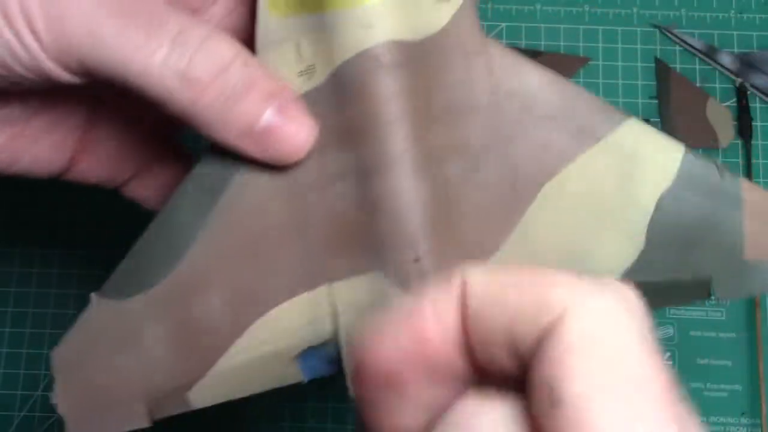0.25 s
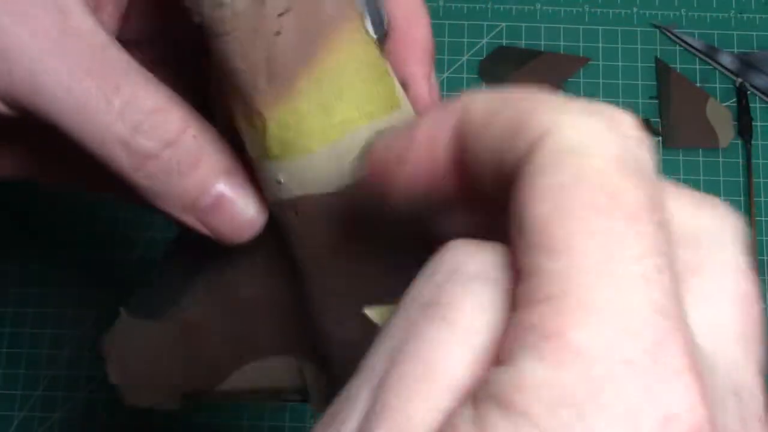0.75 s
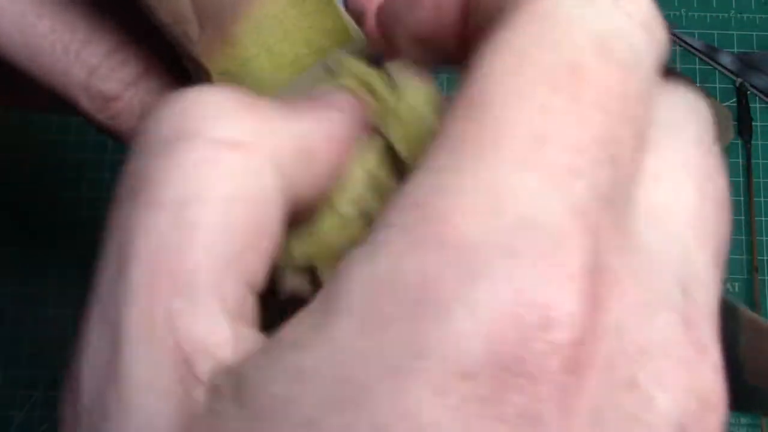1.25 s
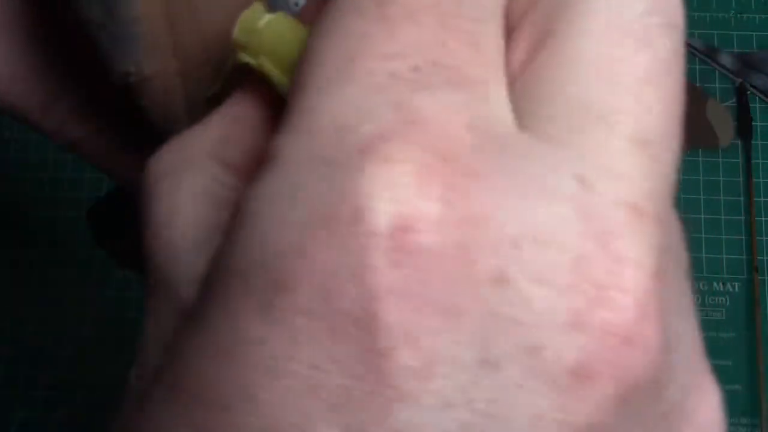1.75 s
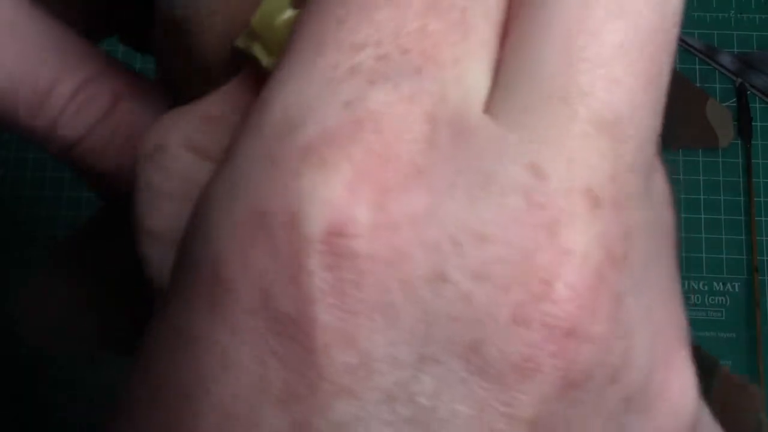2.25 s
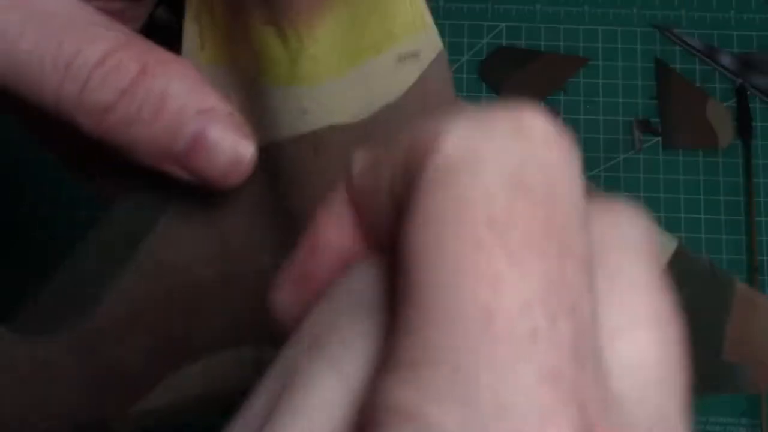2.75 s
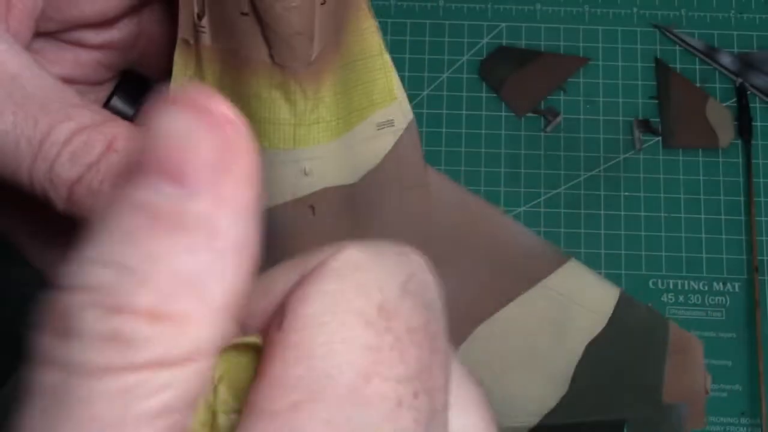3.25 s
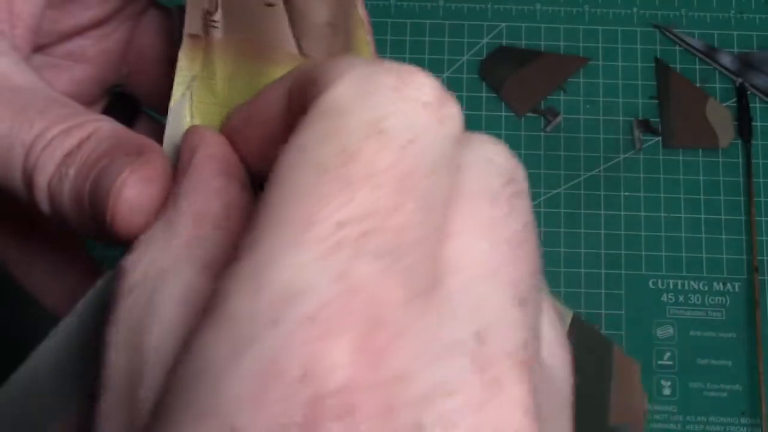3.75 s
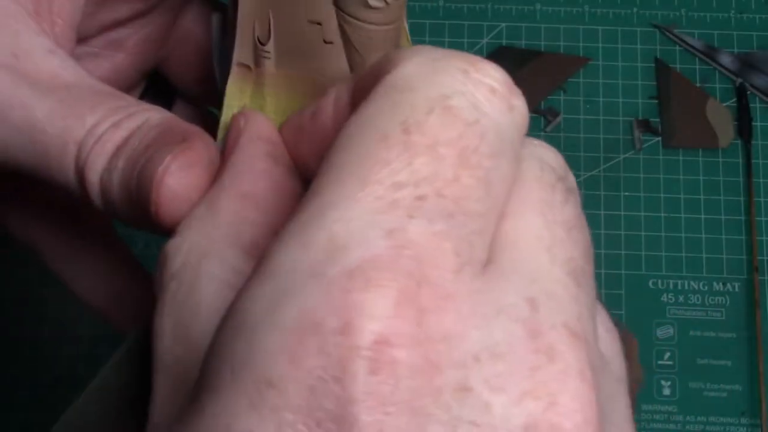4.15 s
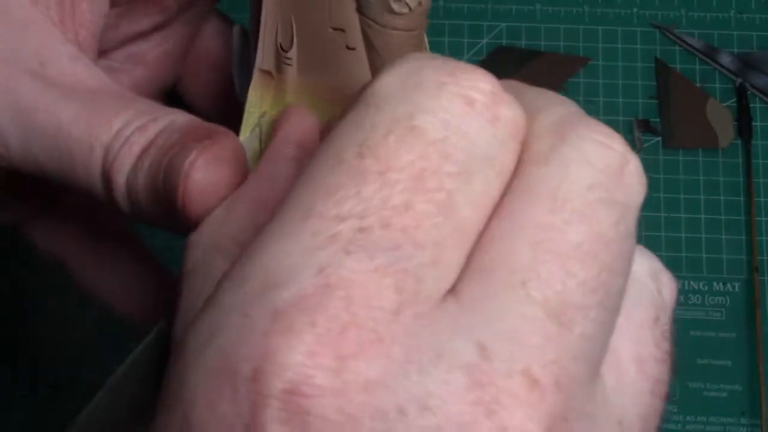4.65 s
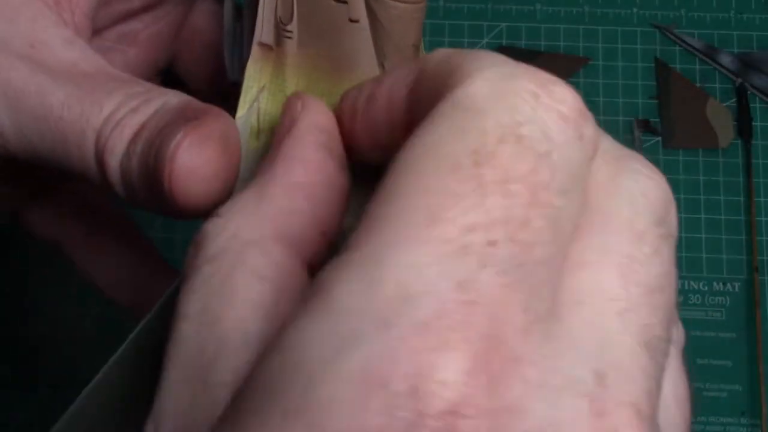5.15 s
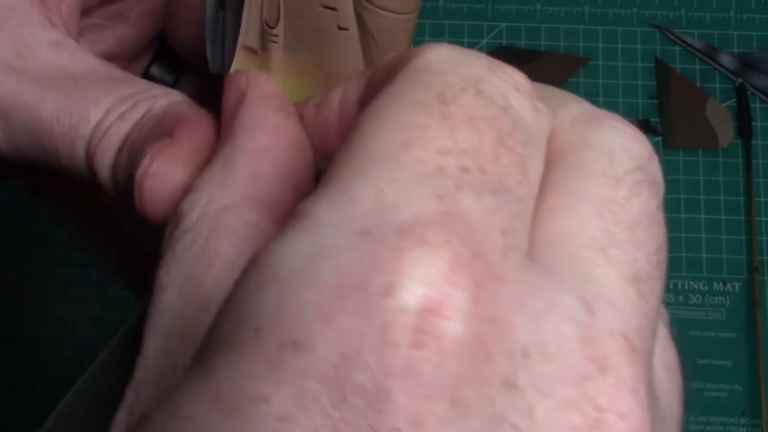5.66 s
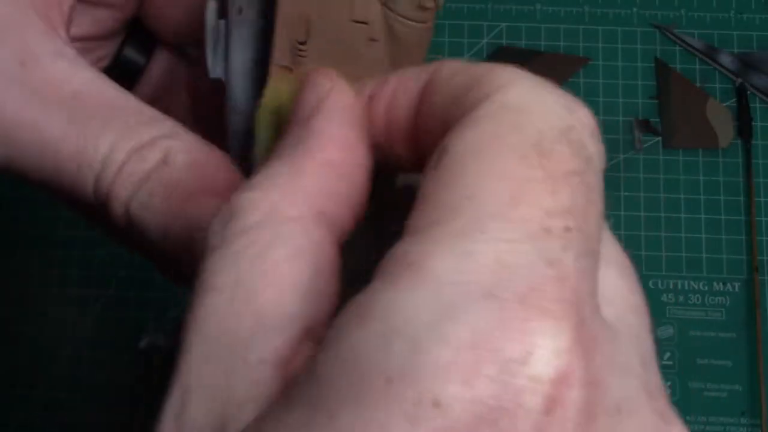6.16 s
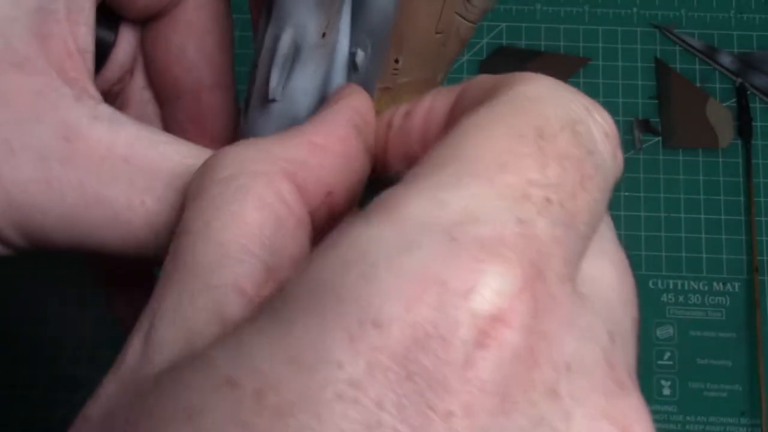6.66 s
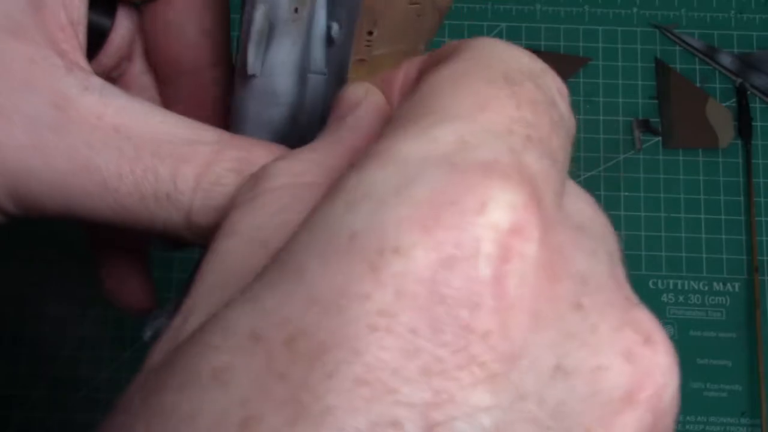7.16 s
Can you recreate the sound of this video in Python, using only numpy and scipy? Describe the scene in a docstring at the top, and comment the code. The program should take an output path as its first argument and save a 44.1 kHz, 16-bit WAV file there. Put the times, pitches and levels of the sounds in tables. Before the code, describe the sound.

Hands work sticky tape and thin paper right in front of the microphones. Busy dry crackling with bright snaps opens, pauses around a run of hollow plastic ticks, and returns with small squeaks and crumples. Then it quietens to gentle finger rubs and rustles, interrupted by a hard plastic clack and later a second, softer one. The small room adds a short, faint reflection and a low steady hush.

```python
"""Peeling tape and paper off a plastic model

Masking tape and paper leave a hollow model and crumple in the fingers: random slips drive shell, paper and glue.
Creases snap as noise bursts through resonances, the tape squeaks as narrow noise with a gliding pitch.
The shell clicks as damped modes with a crack of noise, hands bump the bench as short sine swings.
Close stereo microphones, a small room of fading noise reflections, steady room tone of coloured noise.
"""
import sys
import numpy as np
from scipy import signal
from scipy.fft import rfft, irfft, next_fast_len
from scipy.io import wavfile
from scipy.ndimage import uniform_filter1d

SR = 44100
rng = np.random.default_rng(int(sys.argv[2]) if len(sys.argv) > 2 else 0)


def store_pcm(level_fs):
    """Save levels as 16-bit WAV."""
    pcm = np.round(np.clip(level_fs, -1, 1) * 32767).astype(np.int16)
    wavfile.write(sys.argv[1], SR, np.atleast_2d(pcm).T)


N = 326781

# colour of rubbing on the shell: f/Hz, relative density/dB per Hz
RUB_COLOUR = [(100, -21), (280, -0.5), (600, -1), (1200, 6), (2000, 4), (2500, -4), (4000, -46)]
# colour of glue fizz and sharp edges: f/Hz, relative density/dB per Hz
FIZZ_COLOUR = [(4000, -33), (5600, 3), (6700, 3), (8500, 0), (11000, -4.5), (13500, -9.5), (16000, -31.5)]


def gain_of(db):
    """Decibels to an amplitude factor."""
    return 10 ** (np.asarray(db) / 20)


def evened(x):
    """Scaled to an rms of 1."""
    return x / np.sqrt(np.mean(x ** 2) + 1e-20)


def struck(x, size):
    """Scaled as if all its energy fell in size samples at an rms of 1."""
    return x / np.sqrt(np.sum(x ** 2) / size + 1e-20)


def blend(a, b, share):
    """Two sounds at a joint rms of 1, the second with this share of the power."""
    share = np.clip(share, 0, 1)
    return evened(np.sqrt(1 - share) * evened(a) + np.sqrt(share) * evened(b))


def read(points, hz):
    """A table of points joined on a log-frequency axis."""
    f, value = np.transpose(points)
    return np.interp(np.log(hz + 1), np.log(f + 1), value)


def add(mix, s, sound):
    """Mixes a sound in at time s."""
    part = mix[max(round(s * SR), 0):][:len(sound)]
    part += sound[:len(part)]


def coloured(x, points, ripple_db=0, size=2048):
    """Minimum-phase filter with this spectrum; ripple adds the many small resonances of a sheet."""
    hz = np.fft.rfftfreq(size, 1 / SR)
    ripple = evened(uniform_filter1d(rng.standard_normal(len(hz)), size=7))
    log_gain = np.log(gain_of(read(points, hz) + ripple_db * ripple))
    both_sides = np.r_[log_gain, log_gain[-2:0:-1]]
    spectrum = np.exp(signal.hilbert(both_sides).conj())
    taps = np.fft.ifft(spectrum).real
    return signal.oaconvolve(x, taps[:size // 2])[:len(x)]


def resonate(x, hz, width_hz):
    """A resonance of gain 1 that can follow a moving pitch: shift to 0 Hz, low-pass, shift back."""
    turn = np.exp(2j * np.pi * np.cumsum(hz * np.ones(len(x))) / SR)
    r = np.exp(-np.pi * width_hz / SR)
    slow = signal.lfilter([1 - r], [1, -r], x / turn + 1e-18)
    return 2 * (turn * slow).real


def hush():
    """Steady room tone: coloured noise, mostly alike in both channels."""
    # colour: f/Hz, relative density/dB per Hz
    colour = [(25, -28), (45, -17), (60, -8), (85, -10.5), (130, -2.5), (330, 0.5), (700, -3.5),
              (1300, -7.5), (2000, -9), (4000, -17.5), (7000, -22), (13000, -30.5), (16000, -52)]
    # left-right likeness: f/Hz, correlation
    likeness = [(30, 0.36), (120, 0.86), (300, 0.77), (1000, 0.8), (4000, 0.64), (14000, 0.89)]
    level_db = -62.5
    size = next_fast_len(N)
    hz = np.fft.rfftfreq(size, 1 / SR)
    left, other = rfft(rng.standard_normal((2, size)))
    same = np.clip(read(likeness, hz), -1, 1)
    right = same * left + np.sqrt(1 - same ** 2) * other
    pair = np.array([left, right]) * gain_of(read(colour, hz))
    return gain_of(level_db) * evened(irfft(pair, size)[:, :N])


def handling():
    """Levels of rub, crinkle, fizz and spread of slip sizes (dB): strokes build, swell, die over a rustle."""
    # pulls, rubs and squeezes of the fingers, levels before the trims in peeling: start/s, length/s,
    # crinkle/dB, swell over the stroke/dB, rub/dB re crinkle, fizz/dB re crinkle,
    # spread of slip sizes/dB (low slides, high crumples)
    strokes = [(0.023, 0.044, -43, -2, -6, -4.5, 1.5), (0.102, 0.059, -43, 1.5, -6.5, -3, 3.5),
               (0.228, 0.061, -50.5, -7, -10, 0, 9.5), (0.318, 0.013, -39.5, -4, -22, -4.5, 2),
               (0.463, 0.025, -37, 13, -8, 0, 6), (0.563, 0.13, -50.5, 5.5, 0, -3.5, 4),
               (0.832, 0.053, -48, 4, -11.5, -5, 4), (0.938, 0.052, -40.5, -1, -13, -4.5, 3),
               (1.108, 0.068, -47, -2.5, -6.5, 2.5, 2), (1.194, 0.053, -43.5, 6, -6, -2, 3),
               (1.426, 0.041, -57.5, 2, -2.5, -1, 6.5), (1.546, 0.034, -61, 13.5, 5, 3, 15),
               (1.636, 0.055, -61.5, -4, 3, 1, 5), (1.81, 0.17, -61.5, -6, 9, -9, 4),
               (2.192, 0.096, -48.5, -7.5, -4, -1, 2), (2.441, 0.007, -53.5, 4.5, 0, -8, 8.5),
               (2.511, 0.069, -55, -2, 0, -0.5, 9.5), (2.644, 0.028, -55, -8, 2, -0.5, 5),
               (2.724, 0.042, -54, -6, -1.5, 0, 0.5), (2.887, 0.061, -40, 11.5, -15.5, -7.5, 2.5),
               (3.081, 0.014, -49.5, 6, -9, 0, -0.5), (3.233, 0.014, -52, -4, -1.5, -1.5, 2),
               (3.27, .022, -49.5, 0, 4, 2.5, 2.5), (3.328, 0.041, -44.5, -1.5, -19.5, 0, 4.5),
               (3.418, .05, -62, 14, -7, -7, 8.5), (3.676, 0.088, -63.5, 10, 6, -4, 2.5),
               (3.97, 0.032, -63, 0, 2, -12, 3.5), (4.076, 0.036, -58.5, 7, 0, -10.5, 3),
               (4.202, 0.012, -57.5, 5, 1.5, -5, 0.5), (4.264, 0.067, -59, 0, 4, -16, 3.5),
               (4.344, 0.048, -49, 10.5, -5.5, -7, 2.5), (5.184, 0.11, -63, -1, 3, -10.5, 2.5),
               (5.466, 0.048, -59, -6, -16, -1, 2), (5.744, 0.03, -68.5, 15, 12.5, -9, 10.5),
               (6.018, 0.081, -51, -6.5, -7.5, -6, 2.5), (6.176, 0.012, -56, 5, 5, -13, 2),
               (6.23, 0.025, -49, 2.5, -0.5, -5, 2), (6.315, 0.038, -53, 2, -5.5, -10, 1),
               (6.517, 0.046, -60, -7, -7, -9, 3), (6.682, 0.061, -58.5, -1, -5, -11, 2.5),
               (6.889, 0.022, -52.5, 1, -6, -16, 7.5), (7.077, 0.096, -55, -7, -0.5, -2, 0)]
    # rustle of the held paper, before the trims: t/s, crinkle/dB
    rustle_points = [(0, -69), (.4, -53.5), (.53, -51), (.78, -57), (.91, -71.5), (1.05, -70), (1.39, -69),
                     (1.65, -63.5), (2.08, -69.5), (2.48, -67), (2.82, -52), (3.04, -54), (3.21, -71),
                     (3.4, -55.5), (3.9, -75), (4.65, -63.5), (4.8, -72), (5.9, -73), (6.0, -59),
                     (6.43, -74), (6.95, -63.5), (7.4, -70.5)]
    rustle_rub_db, rustle_fizz_db, rustle_spread_db = -6, -5.5, 4.5
    # 20 dB rise and fall times: fixed part plus share of the length, so slow strokes are softer
    attack_s, attack_share = 0.012, 0.35
    release_s, release_share = 0.022, 0.543

    t = np.arange(N) / SR
    rustle = gain_of(np.interp(t, *np.transpose(rustle_points))) ** 2
    power = rustle * gain_of([[rustle_rub_db], [0], [rustle_fizz_db]]) ** 2
    spread = rustle * rustle_spread_db
    for start, length, db, swell_db, rub_db, fizz_db, spread_db in strokes:
        attack = attack_s + attack_share * length
        release = release_s + release_share * length
        near = slice(*np.searchsorted(t, [start - 2 * attack, start + length + 2 * release]))
        age = t[near] - start
        fade = np.maximum(-age / attack, 0) + np.maximum((age - length) / release, 0)
        swell = swell_db * (np.clip(age / length, 0, 1) - 0.5)
        pull = gain_of(db + swell - 20 * fade) ** 2
        power[:, near] += pull * gain_of([[rub_db], [0], [fizz_db]]) ** 2
        spread[near] += pull * spread_db
    rub, crinkle, fizz = 10 * np.log10(power)
    return rub, crinkle, fizz, spread / power[1]  # power-weighted mean spread


def sheet(slips, points, ripple_db, count=7, size=1500):
    """The sheet keeps changing shape: each run of size slip samples rings one of count sets of facets."""
    shape = np.repeat(rng.integers(0, count, N // size + 1), size)[:N]
    return evened(sum(coloured(slips * (shape == k), points, ripple_db) for k in range(count)))


def shell_ring(wing_db=0, tilt_db=0, linger_db=-29, linger_s=0.28, lowest_hz=260):
    """The shell's answer to a tap: the hand stops most of each mode quickly, a little lingers (t60 linger_s)."""
    # hand-damped modes of the shell: f/Hz, relative level/dB, t60/s
    shell_modes = [(340, -19, 0.047), (518, -16.5, 0.18), (727, -11.5, 0.14), (877, -3.5, 0.026),
                   (1185, -3.5, 0.083), (1294, -3.5, 0.074), (1508, 4.5, 0.03), (1696, -1.5, 0.029),
                   (2310, -29, 0.026), (2496, 4.5, 0.0077), (2900, -0.5, 0.029), (3290, 2.5, 0.013),
                   (3300, -2.5, 0.059), (3930, -4.5, 0.025), (4200, -4, 0.024), (4700, -3, 0.015),
                   (4780, -16, 0.031), (6030, -23, .02), (7030, -26, 0.02)]
    # close pair of modes of the wing panel: f/Hz, relative level/dB, t60/s
    wing_modes = [(1843, 6, 0.03), (2020, 3, 0.016)]
    t = np.arange(SR // 4) / SR
    modes = list(shell_modes) + [(hz, db + wing_db, t60) for hz, db, t60 in wing_modes]
    linger = gain_of(linger_db - 60 * t / linger_s)
    ring = np.zeros(len(t))
    for k, (hz, db, t60) in enumerate(sorted(modes, key=lambda mode: mode[0])):
        level = gain_of(db + tilt_db * np.log2(hz / wing_modes[0][0]))
        decay = gain_of(-60 * t / t60) + linger
        ring += (-1) ** k * level * np.cos(2 * np.pi * hz * t) * decay  # neighbours in opposite sign
    # a small body radiates little bass
    return signal.sosfilt(signal.butter(2, lowest_hz, "high", fs=SR, output="sos"), ring)


def peeling(rub, crinkle, fizz, spread_db, slips_per_s=11000, clumping=0.91):
    """Thousands of tiny slips and glue threads, in clumps, drive shell, paper and air together."""
    # colour of the paper: f/Hz, relative density/dB per Hz
    crinkle_colour = [(1200, -27), (1900, -22.5), (2350, 5.5), (3200, 3.5), (4000, 4.5), (6000, -3),
                      (7200, -10.5), (11000, -51.5)]
    shell_share, flap_share = 0.031, 0.096  # of the power
    rub_trim_db, crinkle_trim_db, fizz_trim_db = -1, -3, -2
    # free flap: short and high while glue lets go, long and low while paper drags on the shell
    flap_mid_hz, flap_octaves_per_db, flap_width_hz = 3700, 0.13, 1400

    clumps = gain_of(clumping * spread_db * evened(uniform_filter1d(rng.standard_normal(N), size=130)))
    sizes = gain_of(spread_db * np.minimum(rng.exponential(1, N), 5)) * rng.choice([-1, 1], N)
    slips = sizes * clumps * (rng.random(N) < slips_per_s / SR)
    slips /= np.sqrt(uniform_filter1d(slips ** 2, size=900) + 1e-6)  # the pull sets the mean power

    ringing = signal.oaconvolve(slips, shell_ring())[:N]
    shell = blend(sheet(slips, RUB_COLOUR, ripple_db=5), ringing, shell_share)
    flap_hz = flap_mid_hz * 2 ** np.clip(flap_octaves_per_db * (fizz - rub), -1, 1)
    flap = resonate(np.roll(slips, 60), flap_hz, 2 * flap_width_hz)  # 60 samples late
    flap = resonate(flap, flap_hz, flap_width_hz)
    paper = blend(sheet(slips, crinkle_colour, ripple_db=3.2), flap, flap_share)
    glue = sheet(slips, FIZZ_COLOUR, ripple_db=2.5)
    return (gain_of(rub + rub_trim_db) * shell + gain_of(crinkle + crinkle_trim_db) * paper
            + gain_of(fizz + fizz_trim_db) * glue)


def lesser_creases(crinkle_db, spread_db, count=400):
    """Chance snap rows (s, dB, Hz, edge dB): only while the paper crumples, as strong as it is worked."""
    creases_per_s, crumpling_from_db = 14, 3.5  # rate while the spread of slips exceeds the threshold
    level_db, level_scatter_db = 4.5, 2.5  # re crinkle of the moment, both before trims
    mid_hz, scatter_octaves = 3600, 0.22
    edge_db, edge_scatter_db = -6, 6  # re the snap's level
    at, chance = rng.integers(0, N, count), rng.random(count)
    size, pitch, edge = rng.standard_normal((count, 3)).T
    rows = np.column_stack([at / SR,
                            crinkle_db[at] + level_db + level_scatter_db * size,
                            mid_hz * 2 ** (scatter_octaves * pitch),
                            edge_db + edge_scatter_db * edge])
    happens = chance < creases_per_s * N / SR / count
    return list(rows[happens & (spread_db[at] > crumpling_from_db)])


def snaps(rows, buckle_s=0.0016, scatter=0.34, width_hz=1300, trim_db=-2, push_db=-14, skin_db=-8):
    """A crease buckles in a sharp step and short rattle; the facet beside it and plastic beneath ring."""
    # thin plastic under the tape: f/Hz, relative level/dB, t60/s
    skin_modes = [(2290, 8, 0.05), (2615, 4.5, 0.03), (3390, -15, .08), (3960, -3, 0.071), (4230, -4, 0.19),
                  (4950, -1.5, 0.036), (6200, -6, 0.037), (8350, 1, 0.097)]
    out, t = np.zeros(N), np.arange(4400) / SR
    skin = sum(gain_of(db - 60 * t / t60) * np.cos(2 * np.pi * hz * t) for hz, db, t60 in skin_modes)
    for s, db, hz, edge_db in rows:
        buckle = scatter * rng.standard_normal(len(t)) * np.exp(-t / buckle_s)
        buckle[0] += 1
        facet = np.diff(resonate(buckle, hz, 2 * width_hz), prepend=0)
        facet = resonate(facet, hz, width_hz)
        parts = [(0, facet),
                 (edge_db, coloured(buckle, FIZZ_COLOUR)),
                 (push_db, coloured(buckle, RUB_COLOUR)),
                 (skin_db, signal.fftconvolve(facet, skin)[:len(t)])]
        add(out, s, sum(gain_of(db + trim_db + part_db) * struck(part, size=200) for part_db, part in parts))
    return out


def squeaks():
    """Uneven stick and slip sets a taut strip ringing; its pitch moves with the free length."""
    # start/s, end/s, start f/Hz, end f/Hz, width of each resonance/Hz, rms before taper/dB
    squeak_rows = [(0.575, 0.73, 1610, 1750, 500, -55), (2.189, 2.395, 524, 500, 384, -55),
                   (2.208, 2.333, 1050, 990, 190, -52), (2.214, 2.308, 3420, 3200, 260, -51.5),
                   (2.244, 2.46, 3390, 3410, 90, -65.5), (2.694, 2.788, 1510, 1630, 150, -46.5),
                   (3.617, 3.661, 560, 500, 490, -54.5), (4.34, 4.404, 2500, 2580, 200, -48.5),
                   (4.349, 4.405, 2030, 2000, 180, -48), (4.371, 4.402, 1226, 1270, 150, -47.5),
                   (7.039, 7.273, 2360, 2480, 420, -58)]
    out = np.zeros(N)
    for start, end, from_hz, to_hz, width_hz, db in squeak_rows:
        count = max(int((end - start) * SR), 100)
        hz = np.linspace(from_hz, to_hz, count)
        tone = resonate(rng.standard_normal(count), hz, width_hz)
        tone = resonate(tone, hz, width_hz)
        add(out, start, gain_of(db) * evened(tone) * signal.windows.tukey(count, 0.5))
    return out


def bumps():
    """Soft bumps of hands and model push the bench top into a short swing."""
    # t/s, f/Hz, level/dB, length/s
    bump_rows = [(1.068, 127, -58, 0.092), (1.785, 58, -67, 0.15), (1.80, 115, -63.5, 0.054),
                 (1.81, 182, -57.5, 0.061), (2.382, 56, -74.5, 0.1), (3.621, 297, -59, 0.015),
                 (3.648, 340, -71.5, 0.024), (4.493, 169, -57, 0.016), (5.925, 258, -61, 0.014),
                 (6.553, 310, -69, 0.039), (6.616, 215, -64.5, 0.032), (6.717, 215, -66, .03),
                 (7.341, 323, -66, 0.035)]
    out = np.zeros(N)
    for s, hz, db, length in bump_rows:
        t = np.arange(int(length * SR)) / SR
        add(out, s, gain_of(db) * evened(np.sin(2 * np.pi * hz * t) * np.hanning(len(t))))
    return out


def clicks(crack_s=0.0051, edge_s=0.0025, edge_db=-2, bounce_s=0.00306, bounce=0.15, grip_db=9, grip_s=0.0082):
    """The shell slips in the grip: a crack, its modes, and the bench's reflection just behind."""
    # t/s, level/dB, extra wing ring/dB, tilt of the ring/dB per octave, crack/dB re level
    click_rows = [(1.803, -49, 0, -5, -12), (1.8198, -31.5, 2, -1.5, -9), (1.898, -40, 2, -4, -26),
                  (1.9089, -38, 0, -1.5, -25), (1.932, -41.5, 2, -3, -11.5), (1.9656, -47.5, 1, -1.5, -11),
                  (2.0094, -45.5, -1, -3.5, -12.5), (3.1086, -47.5, 1, -1, -9),
                  (3.356, -42.5, -2, -1.5, -2), (3.7027, -49.5, 1, 0.5, -27), (3.807, -40.5, 4.5, 2, -8.5),
                  (4.1605, -55.5, -5, -2, 1.5), (4.214, -54.5, -13, 6, -8), (4.2836, -44, -3, -3.5, -12),
                  (4.4958, -19, 6.5, -0.5, -13.5), (4.816, -60, -1, 0, -4), (5.093, -62.5, -5.5, 3, -19),
                  (5.238, -57, -3, -4, -6), (5.3105, -58.5, -3, 8, -6), (5.7604, -49.5, 12.5, -11, -12),
                  (5.774, -50.5, -7, -7, -9), (5.929, -28.5, -1, 0.5, -2.5), (6.602, -58, -3, -8, -4.5)]
    # colour of the crack: f/Hz, relative density/dB per Hz
    crack_colour = [(100, -49), (600, -2), (2000, 6.5), (3500, 4), (6000, 2), (9000, -11), (12000, -28),
                    (16000, -26)]
    out = np.zeros(N)
    for s, db, wing_db, tilt_db, crack_db in click_rows:
        ring = shell_ring(wing_db, tilt_db)
        t = np.arange(len(ring)) / SR
        ring = ring * gain_of(grip_db * np.exp(-(t / grip_s) ** 2))  # free until the fingers catch it
        body = ring.copy()
        add(body, bounce_s, bounce * ring)
        crack = coloured(rng.standard_normal(len(t)) * np.exp(-t / crack_s), crack_colour)
        edge = coloured(rng.standard_normal(len(t)) * np.exp(-t / edge_s), FIZZ_COLOUR)
        parts = [(0, body), (crack_db, crack), (2 * crack_db + edge_db, edge)]  # harder crack is brighter
        add(out, s, sum(gain_of(db + part_db) * struck(part, size=440) for part_db, part in parts))
    return out


def room(x, apart=0.13, early_db=4, early_s=0.014):
    """Dense reflections, strongest from the nearby bench, each band dying at its own speed."""
    # f/Hz, t60/s
    decay = [(150, 0.86), (600, 0.49), (2000, 0.29), (5000, 0.41), (9000, 0.3), (15000, 0.53)]
    taps = rng.standard_normal((2, SR // 2)) * (rng.random((2, SR // 2)) < 0.1)
    taps[:, :130] = 0  # gap before the first reflection
    hz, t, z = signal.stft(taps, SR, nperseg=256)
    fade_db = -60 * t / read(decay, hz)[:, None] + early_db * np.exp(-t / early_s)
    mid, side = signal.istft(z * gain_of(fade_db), SR, nperseg=256)[1]
    tail = np.array([mid + apart * side, mid - apart * side])
    return signal.fftconvolve(x[None], tail / np.linalg.norm(tail[0]), axes=1)[:, :N]


def shifting_room(x, turns_per_s=4.3, count=4):
    """The hands keep moving: the sound crossfades round count patterns of reflections."""
    place = np.arange(N) / SR * turns_per_s * count
    return sum(room(x * np.sin(np.pi / 2 * np.minimum((place + k) % count, 2))) for k in range(count))


def scene(snap_room_db=-11, click_room_db=-9, peel_room_db=-11, balance_db=0.19, offset_samples=0.11):
    """Hands and model right in front of the microphones, the room behind."""
    # loudest creases: t/s, level before trim/dB, f/Hz, sharp edge/dB re level
    loud_snaps = [(0.0586, -35, 3450, -10), (0.0659, -37, 3930, -14), (0.1101, -38, 5440, 8),
                  (0.1597, -38.5, 4170, 1.5), (0.2181, -47, 5270, 7), (0.241, -34, 4194, -1.5),
                  (0.2649, -37.5, 2240, -19), (0.2906, -43.5, 2500, -15), (0.3216, -31, 2600, -6),
                  (0.3261, -39, 2700, -18), (0.3361, -34, 3580, -10), (0.3973, -41, 3320, -14),
                  (0.4596, -37, 3600, -16), (0.4672, -32.5, 2500, -16), (0.476, -23, 2900, -35),
                  (0.4908, -25, 3930, -17), (0.685, -45, 4215, 9.5), (0.797, -43, 2740, -6),
                  (0.8518, -36.5, 3220, -18), (0.8644, -36.5, 3360, -7), (0.9382, -39.5, 4330, -5),
                  (0.9791, -37, 4000, -16), (1.1195, -38, 4700, -3.5), (1.2477, -33.5, 3500, -13),
                  (1.481, -50.5, 5300, 3.5), (1.491, -46.5, 5420, -5), (1.5834, -49, 1670, -6),
                  (2.4462, -43.5, 3700, -28), (2.5033, -48.5, 3150, 9), (2.5059, -42.5, 3000, -1.5),
                  (2.5777, -46.5, 4700, -6.5), (2.651, -37, 4040, -34), (2.7454, -39, 3300, -23),
                  (2.7751, -38.5, 3170, -7), (2.896, -38.5, 3740, -20), (2.9427, -38, 4260, -8),
                  (2.956, -33.5, 3800, -21), (2.9635, -28, 3430, -32), (3.1092, -34.5, 3080, 5),
                  (3.2686, -46, 3400, 2), (3.2851, -41.5, 3900, 0), (3.3208, -34, 4400, -5),
                  (3.3464, -33, 4100, -5.5), (3.7468, -49, 2500, -1), (4.02, -51.5, 5510, -5),
                  (4.4076, -46, 4630, 0), (5.4351, -53, 4000, -16), (6.9131, -52, 3520, -22)]
    rub, crinkle, fizz, spread = handling()
    peel = peeling(rub, crinkle, fizz, spread) + squeaks()
    knocks = clicks() + bumps()
    creases = snaps(list(loud_snaps) + lesser_creases(crinkle, spread))
    near = peel + creases + knocks
    lead = offset_samples * np.gradient(near)  # left a hair early, right a hair late
    direct = np.array([near + lead, near - lead]) * gain_of([[balance_db], [-balance_db]])
    send = gain_of(snap_room_db) * creases + gain_of(click_room_db) * knocks + gain_of(peel_room_db) * peel
    return direct + shifting_room(send) + hush()


def record(dry):
    """Band limit of the microphone channel: a steep linear-phase low-pass."""
    edge_hz = 15900
    taps = signal.firwin(511, edge_hz, window=("kaiser", 9), fs=SR)
    return signal.oaconvolve(dry, taps[None], "same")


dry = scene()
out = record(dry)
store_pcm(out)
```